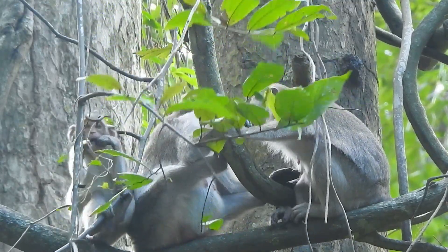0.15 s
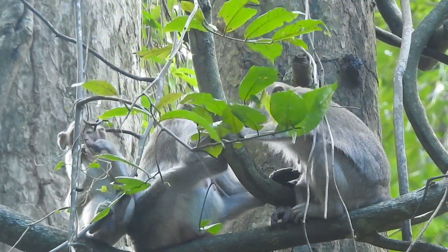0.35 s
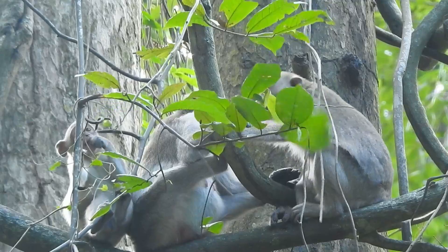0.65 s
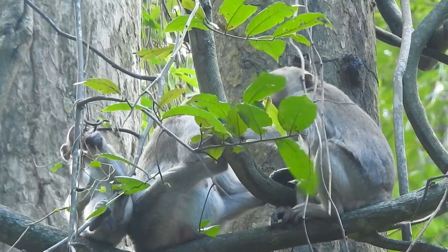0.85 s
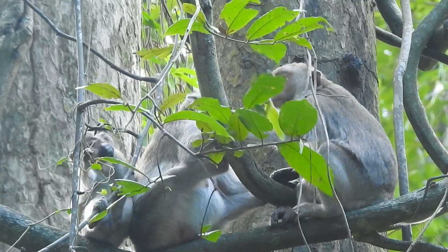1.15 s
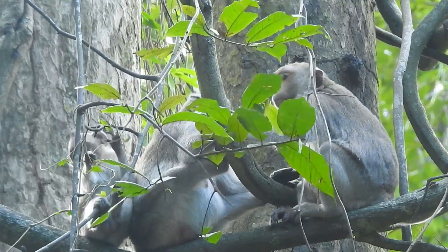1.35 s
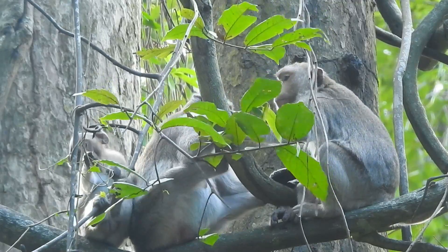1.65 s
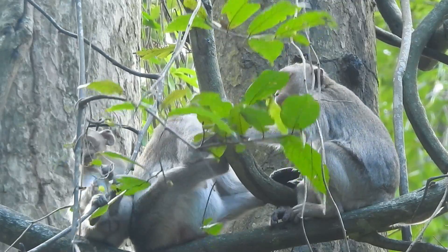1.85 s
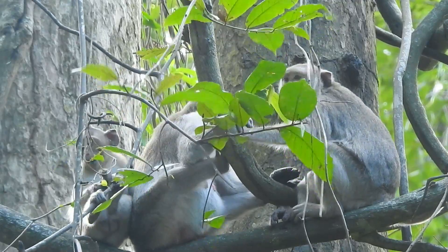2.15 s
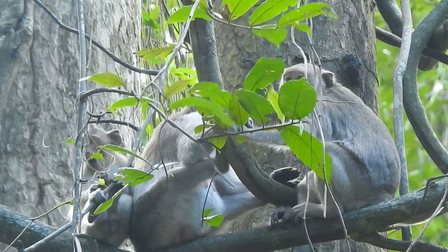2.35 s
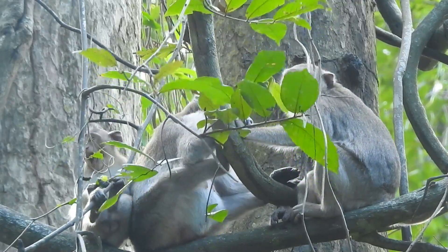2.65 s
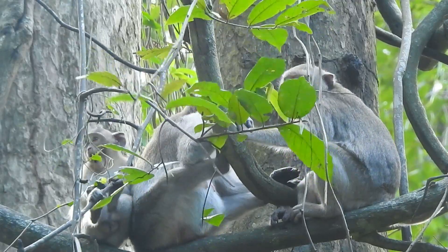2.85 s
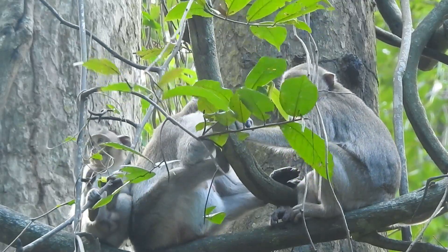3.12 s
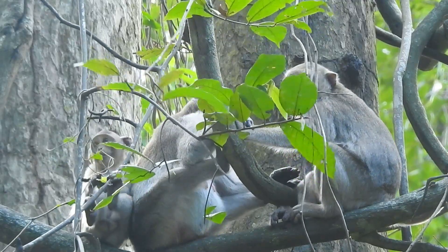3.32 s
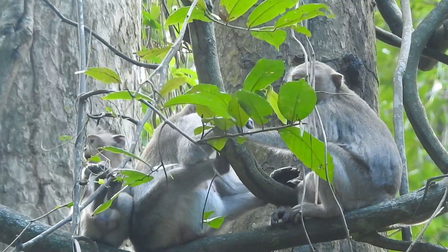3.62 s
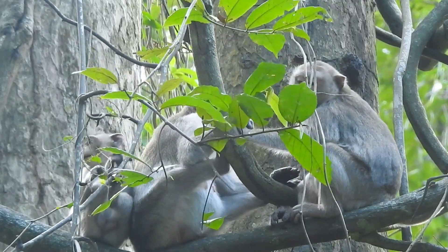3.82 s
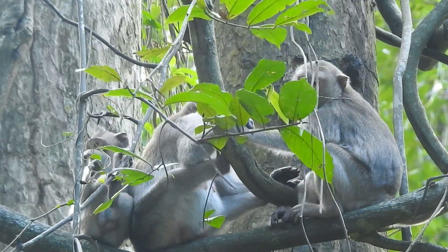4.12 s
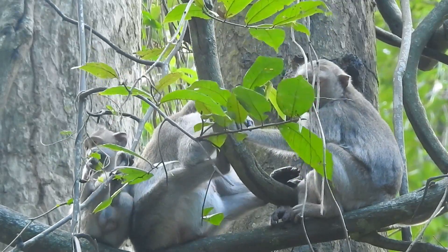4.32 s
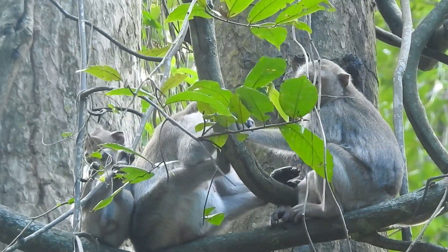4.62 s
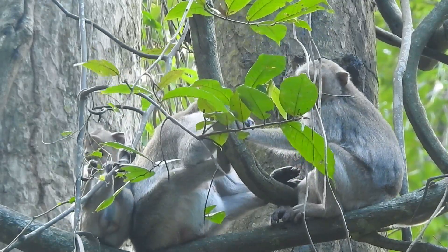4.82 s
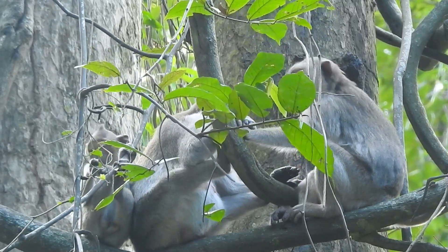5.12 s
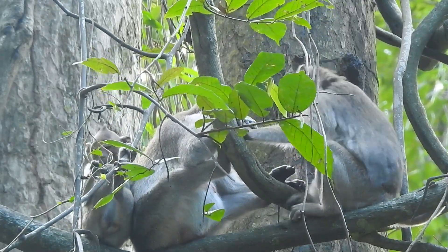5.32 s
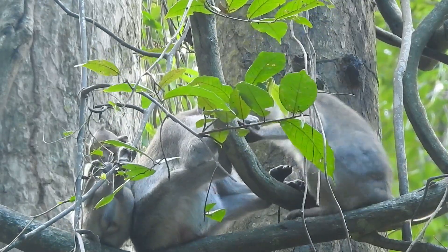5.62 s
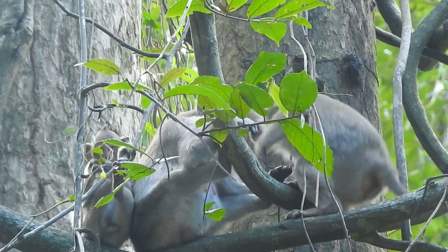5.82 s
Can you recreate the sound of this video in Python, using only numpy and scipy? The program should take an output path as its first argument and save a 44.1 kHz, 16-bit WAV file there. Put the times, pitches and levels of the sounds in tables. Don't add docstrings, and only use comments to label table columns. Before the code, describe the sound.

A single monkey calls almost continuously in short, shrill notes, hoarse low squawks breaking into higher squeals. The calls ring off trunks and leaves with a long diffuse tail. A branch rustles briefly around one and a half seconds, twigs tick now and then, and a tiny bird chips near the end. Distant traffic rumbles steadily under thin forest hiss and insect buzz, heard in stereo from moderate distance.

```python
import sys
import numpy as np
from scipy import signal
from scipy.fft import rfft, irfft
from scipy.io import wavfile
from scipy.ndimage import map_coordinates

SR = 44100
rng = np.random.default_rng(int(sys.argv[2]) if len(sys.argv) > 2 else 0)


def materialize(psi):
    bounded = np.clip(np.atleast_2d(psi).T, -1, 1)
    quanta = np.round(bounded * 32767).astype(np.int16)
    wavfile.write(sys.argv[1], SR, quanta)


def voltage_ratio(level):
    return 10 ** (np.asarray(level, float) / 20)


N = 263277


def at_hz(points, hz):
    points_hz, values = np.transpose(points)
    return np.interp(np.log(np.maximum(hz, 1)), np.log(points_hz), values)


def rms_one(x):
    return x / np.sqrt(np.mean(x ** 2) + 1e-20)


def wobble(rate_hz, size):
    r = np.exp(-2 * np.pi * rate_hz / SR)
    settled = signal.lfilter([1], [1, -2 * r, r * r], rng.standard_normal(size + 8000))[8000:]
    return rms_one(settled)


def colour(x, spectrum, lift_db=lambda hz: 0):
    hz = np.fft.rfftfreq(x.shape[-1], 1 / SR)
    gain_db = at_hz(spectrum, hz) + lift_db(np.maximum(hz, 1500))
    return rms_one(irfft(rfft(x) * voltage_ratio(gain_db), x.shape[-1]))


def resonance(x, hz, width_hz):
    r = np.exp(-np.pi * width_hz / SR)
    zeros = np.array([1, 0, -1]) * (1 - r * r) / 2
    return signal.lfilter(zeros, [1, -2 * r * np.cos(2 * np.pi * hz / SR), r * r], x)


# (frequency [Hz], likeness [0-1])
LIKENESS = [(60, 0.98), (130, 0.99), (280, 0.97), (590, .93), (1270, 0.9), (2720, 0.88), (5000, 0.83),
            (8000, 0.0), (11500, 0), (12500, .95)]


def stereo_noise(size):
    mid, side = rfft(rng.standard_normal((2, size)))
    alike = np.clip(at_hz(LIKENESS, np.fft.rfftfreq(size, 1 / SR)), 0, 1)
    ears = np.sqrt(1 + alike) * mid + np.sqrt(1 - alike) * side * [[1], [-1]]
    return irfft(ears, size) / np.sqrt(2)


# (frequency [Hz], density [dB per Hz])
TRAFFIC = [(13, -55), (22, -41), (45, -8), (90, -0.5), (108, 2.5), (137, -0.5), (200, -5), (229, -8),
           (265, -17.5), (400, -24), (520, -39), (880, -120)]
# (frequency [Hz], density [dB per Hz])
AIR = [(180, -54), (300, -4.5), (474, -2), (670, -1.5), (760, -6.5), (835, -5), (1670, -6.5), (1890, -8),
       (2080, -5), (3910, -10.5), (4720, 3), (5350, -4), (12900, -35.5), (16800, -78), (22000, -120)]
TRAFFIC_DB, TRAFFIC_SWELL_DB, TRAFFIC_SWELLS_PER_S = -37, 2.17, 4.8
AIR_DB, AIR_SWELL_DB, AIR_SWELLS_PER_S = -43.5, 1.0, 12


def background():
    traffic_db = TRAFFIC_DB + TRAFFIC_SWELL_DB * wobble(TRAFFIC_SWELLS_PER_S, N)
    rumble = colour(stereo_noise(N), TRAFFIC) * voltage_ratio(traffic_db)
    air_db = AIR_DB + AIR_SWELL_DB * wobble(AIR_SWELLS_PER_S, N)
    return rumble + colour(stereo_noise(N), AIR) * voltage_ratio(air_db)


INSECT_HZ, INSECT_WIDTH_HZ, INSECT_DB, INSECT_PULSES_PER_S = 4700, 330, -51, 110


def insects():
    t = np.arange(N) / SR
    pulse_phase = 2 * np.pi * INSECT_PULSES_PER_S * t + 4.3 * wobble(4.6, N)
    gate = (1 + np.cos(pulse_phase)) ** 2.2
    drive = rng.standard_normal((2, N)) * gate * voltage_ratio(1.3 * wobble(18, N))
    wing = resonance(drive, INSECT_HZ, INSECT_WIDTH_HZ)
    wing = resonance(wing, INSECT_HZ, INSECT_WIDTH_HZ)
    return voltage_ratio(INSECT_DB) * rms_one(wing)


# (time [s], peak level [dB])
CHIPS = [
    (5.681, -37),
    (5.858, -45),
]
CHIP_TOP_HZ, CHIP_FALL_HZ_PER_S, CHIP_S = 4850, 60000, .005


def chips():
    at_s, peak_db = np.array(CHIPS).T[:, :, None]
    t = np.arange(N) / SR - at_s
    tone = np.sin(2 * np.pi * (CHIP_TOP_HZ * t - CHIP_FALL_HZ_PER_S * t ** 2 / 2))
    return (voltage_ratio(peak_db) * tone * np.exp(-(t / CHIP_S) ** 2)).sum(axis=0)


# (time [s], level [dB], leaf contacts [per s])
RUSTLE = [
    (1.439, -48, 1400),
    (1.501, -39.5, 4100),
    (1.561, -42.5, 8300),
    (1.622, -43.5, 7200),
    (1.68, -48.5, 3200),
    (1.74, -46, 230),
]
# (frequency [Hz], density [dB per Hz])
LEAVES = [(150, -48), (300, -23), (800, -22), (1600, -24.5), (2200, -15.5), (4000, -24), (6600, -11),
          (9000, -26.5), (13000, -41)]


def rustle():
    s, level_db, per_s = np.transpose(RUSTLE)
    t = np.arange(N) / SR
    contact = rng.random((2, N)) < np.interp(t, s, per_s) / SR
    hits = contact * rng.standard_normal((2, N))
    hits = hits * voltage_ratio(1.4 * np.minimum(rng.exponential(1, (2, N)), 4))
    low = signal.lfilter([.2], [1, -.8], hits)
    hits = hits - low + low.mean(axis=0) * 2.1 + 0.048 * hits[::-1]
    return colour(hits, LEAVES) * voltage_ratio(np.interp(t, s, level_db, left=-120, right=-120))


# (time [s], peak level [dB], centre [Hz], width [Hz])
TICKS = [(1.4, -30, 3500, 3100), (1.555, -25, 5700, 4000), (1.574, -37, 10500, 3000),
         (1.54, -39, 10000, 3000), (1.587, -30, 550, 400), (2.533, -20.5, 1800, 2400),
         (2.535, -29, 600, 800), (2.531, -27, 4500, 3000), (3.549, -29, 4600, 2600),
         (4.235, -36, 6400, 3600), (4.457, -24, 3200, 1200), (4.467, -22.5, 5200, 2300),
         (5.733, -35, 2140, 350), (5.741, -35, 6500, 3500), (5.748, -36, 6000, 3500)]


def twigs():
    out, t = np.zeros(N), np.arange(1200) / SR
    for s, peak_db, hz, width_hz in TICKS:
        burst = rng.standard_normal(len(t)) * t / .001 * np.exp(-t / 0.0031)
        ring = resonance(resonance(burst, hz, width_hz), hz, width_hz)
        ring = signal.lfilter([1, 2, 1], [1], ring)
        at = round((s - .002) * SR)
        out[at:at + len(t)] += voltage_ratio(peak_db) * ring / np.abs(ring).max()
    return out


# (frequency [Hz], T60 [s])
FOREST_T60 = [(500, 1.2), (2800, 1.2), (6000, 1.36), (9000, 1.11), (13000, 0.87)]
FOREST_DB, FOREST_BUILD_S = 1.5, 0.0044
SWAY_S, EAR_SWAY_S = .000045, .000012


def forest(x):
    t = np.arange(SR) / SR
    white, tail = stereo_noise(SR), 0
    edges_hz = 200 * 2 ** np.arange(0, 6.6, .5)
    for low, high in zip(edges_hz, edges_hz[1:]):
        half_octave = signal.butter(2, [low, high], "band", fs=SR, output="sos")
        decay = voltage_ratio(-60 * t / at_hz(FOREST_T60, np.sqrt(low * high)))
        tail = tail + signal.sosfilt(half_octave, white) * decay
    tail = tail * (1 - np.exp(-t / FOREST_BUILD_S))
    tail = tail / np.sqrt(np.sum(tail ** 2) / 2)
    sway = np.arange(N) + SWAY_S * SR * wobble(24, N)
    wet = signal.fftconvolve(map_coordinates(x, [sway], order=3)[None], tail, axes=1)[:, :N]
    stir = np.arange(N) + SWAY_S * SR * wobble(30, N)
    ears = [map_coordinates(ear, [stir + EAR_SWAY_S * SR * wobble(8, N)], order=3) for ear in wet]
    return voltage_ratio(FOREST_DB) * np.array(ears)


def nearest(table, s):
    return min(table, key=lambda row: abs(row[0] - s))[1:]


def waver(rate_hz, size):
    return wobble(rate_hz, 11000)[:size]


# (time [s], pitch settling [s], favoured resonance [Hz], its lift [dB], added chest [dB])
PLACING = [(0, 0.042, 3500, 2.5, 3.5), (.154, 0.012, 4440, 3.5, -5), (.315, 0.012, 3680, -3.5, 0),
           (.472, 0.0019, 5700, 2, -8), (.66, 0.024, 3480, 0, 0), (.845, 0.032, 3540, 0.5, 5.5),
           (.87, .025, 4050, 5.5, -0.5), (.965, 0.024, 5170, 6, 4), (1.14, 0.027, 3450, -1.5, 2),
           (1.378, 0.033, 3700, 9, 3), (1.432, 0.023, 3440, 9, -4.5), (1.52, 0.019, 3540, -8, -5.5),
           (1.605, 0.013, 6200, 12, -17), (1.73, 0.035, 4600, 5.5, 2.5), (1.91, 0.026, 3500, 2, 1.5),
           (1.995, 0.014, 3900, 10, -1), (2.05, 0.019, 4570, 5, 1), (2.215, 0.028, 4280, 0, 1.5),
           (2.41, 0.033, 5740, 1, 1.5), (2.455, 0.024, 2680, 16.5, -4.5), (2.535, 0.017, 4800, 2, -11),
           (2.563, 0.0027, 6000, -2, -4.5), (2.6, .014, 6450, 8, -3), (2.78, 0.038, 4570, 1.5, 2.5),
           (3.11, 0.029, 3600, 7.5, 4), (3.187, 0.0198, 5060, 8, -2), (3.272, 0.0025, 4200, 6.5, 0),
           (3.345, 0.023, 2740, 20, -4), (3.505, 0.024, 3680, 3.5, 0.5), (3.598, 0.0034, 4770, 0, -9),
           (3.855, 0.016, 4520, 2, -0.5), (4.01, 0.02, 4480, 1, -18), (4.22, 0.026, 3770, 2, 3),
           (4.34, 0.013, 6030, 3.5, -4), (4.44, 0.025, 3070, 11, 0), (4.575, 0.009, 3900, 1, 2),
           (4.75, 0.022, 4500, 8, 4), (4.81, 0.057, 2280, 1.5, 4), (4.96, 0.069, 4280, 5, 1),
           (5.065, 0.024, 3040, 1.5, -2.5), (5.325, 0.058, 4980, 8, -2.5), (5.45, 0.022, 3720, -1, -11)]
# (time [s], overshoot [share], time to top [s], later sag [share per s])
ARCHES = [
    (.024, 0.0045, .01, 0.51),
    (.315, 0.009, 0.021, 0),
    (3.272, 0.00025, .01, 0.25),
    (3.505, 0.01, 0.011, 0.043),
    (3.598, 0.048, 0.00546, 0.0086),
    (3.855, 0.021, .03, 0.011),
    (4.22, .02, 0.053, 0.185),
    (4.575, 0.0044, 0.039, 0),
    (4.96, .005, 0.036, 0),
    (5.325, 0.014, 0.026, 0.29),
]


def fold_pitch(t, s, onset_hz, held_hz, sag, hold_s):
    settle_s = max(nearest(PLACING, s)[0], .003)
    arches = [row[1:] for row in ARCHES if abs(row[0] - s) < .005]
    arch, top_s, sag = arches[0] if arches else (0, 1, sag)
    moving_s = np.maximum(t - hold_s * (onset_hz < held_hz), 0)
    pitch = held_hz * (1 - sag * t) + (onset_hz - held_hz) * np.exp(-moving_s / settle_s)
    rise = moving_s / max(top_s, .003)
    return pitch * (1 + arch * rise * np.exp(1 - rise))


BREAKS_DB = 3
RASP_FROM_PARTIAL, RASP_SLOPE_DB_PER_OCTAVE = 5.5, -16


def fold_source(pitch, harsh):
    size = len(pitch)
    tremble = (.003 + .014 * harsh) * waver(35, size) + .05 * harsh ** 2 * waver(200, size)
    phase = 2 * np.pi * np.cumsum(pitch * (1 + tremble)) / SR
    k = np.arange(1, 19)[:, None]
    breaks_db = BREAKS_DB * np.array([signal.detrend(waver(40, size), type="constant") for _ in k])
    rasp_db = RASP_SLOPE_DB_PER_OCTAVE * np.log2(np.maximum(k / RASP_FROM_PARTIAL, 1))
    partials = voltage_ratio(breaks_db + rasp_db) * (k * pitch.max() < 13000)
    pulses = rms_one((partials * np.cos(k * phase + 0.298 * k ** 2)).sum(axis=0))
    chaos = rms_one(rng.standard_normal(size) * (1 + 0.11 * np.cos(phase)))
    flutter = voltage_ratio((-0.5 + 0.39 * harsh) * waver(50, size))
    return (np.sqrt(1 - harsh ** 1.5) * pulses + harsh ** .75 * chaos) * flutter


# (time [s], gape [-1 pressed to 1 open], lip resonance [Hz], bared teeth [0-1])
GAPE = [(0, -0.48, 3940, 0.76), (.15, -0.61, 4400, 0.65), (.47, 0.28, 5300, 0), (0.851, -0.24, 3830, 0.6),
        (1.2, 0.39, 3530, 0.36), (1.34, 0.28, 4780, 0.6), (1.52, -0.26, 3220, 0.5), (1.73, 0.99, 4760, 0.6),
        (2.0, 1, 4170, 0.47), (2.45, 0.16, 2900, 0.26), (2.8, -0.5, 4460, 0.86), (3.199, -0.4, 4240, 0.92),
        (3.55, 0.57, 4160, 0.07), (3.95, 0.11, 4430, 0.45), (4.35, -1, 3920, 0.76), (4.8, 0.71, 4740, 0.65),
        (5.07, -0.51, 3270, 0.6), (5.4, 0.69, 4470, 0.6)]
# (time [s], resonance [Hz], lift or dip [dB], attack [s])
ACCENTS = [(0, 7300, -5, .004), (.024, 4230, 5, 0.013), (.154, 6260, 5.5, 0.019), (.315, 5450, -2, 0.029),
           (.472, 6800, -6, 0.034), (.66, 5000, 0, 0.027), (.845, 5040, -1, 0.027), (.87, 5570, 7, 0.044),
           (.965, 4300, 0, 0.023), (1.14, 5000, 1.5, 0.025), (1.342, 5400, 4, 0.023),
           (1.378, 4840, 5.5, 0.016), (1.432, 5300, 5.5, 0.0085), (1.52, 6700, 8, 0.035),
           (1.605, 4600, -4, .015), (1.73, 5900, 3, 0.027), (1.91, 4100, 2.5, 0.056),
           (1.995, 5300, 6, 0.037), (2.05, 5730, 5, 0.017), (2.215, 5060, 4.5, 0.034),
           (2.41, 8000, 7, 0.032), (2.455, 4300, 1, 0.0092), (2.535, 8000, 3, 0.011),
           (2.563, 4700, 2, 0.023), (2.6, 4850, -4, 0.028), (2.78, 5160, 5, 0.044),
           (3.11, 4840, 4.5, 0.055), (3.19, 4200, 1, 0.02), (3.245, 5000, 3, 0.043),
           (3.272, 5600, 8.5, .02), (3.345, 4150, -14, 0.033), (3.505, 6060, 0, 0.031),
           (3.598, 8040, 2.5, 0.022), (3.855, 5260, 3, 0.038), (4.01, 5470, 2, .03), (4.22, 4700, 4, 0.042),
           (4.3, 5700, -2, 0.027), (4.34, 7500, 0, 0.015), (4.44, 6000, 3, 0.017), (4.575, 5170, 6, 0.039),
           (4.75, 5500, 5, 0.018), (4.81, 4500, 2, 0.016), (4.96, 3300, 0, 0.022), (5.065, 4750, 0, 0.018),
           (5.325, 4250, 5, 0.041), (5.45, 4980, -8, 0.022)]
GAPE_CHEST_DB, GAPE_TILT_DB = 11.5, 4
LIP_DB, LIP_WIDTH_HZ = 2.5, 280
BARED_DB, BARED_HZ = 16, 7200
PLACING_WIDTH_HZ, MOUTH_WIDTH_HZ = 215, 400


def mouth_lift(s, mouth):
    first_hz, first_db, second_hz, second_db, chest_db, tilt_db = mouth
    at_s, *face = np.transpose(GAPE)
    gape, lip_hz, bared = [np.interp(s, at_s, column) for column in face]
    _, placed_hz, placed_db, added_db = nearest(PLACING, s)
    accent_hz, accent_db, _ = nearest(ACCENTS, s)
    chest_db = chest_db + GAPE_CHEST_DB * gape + added_db
    tilt_db = tilt_db + GAPE_TILT_DB * gape
    peaks = [(first_hz, first_db, MOUTH_WIDTH_HZ), (second_hz, second_db, MOUTH_WIDTH_HZ),
             (accent_hz, accent_db, MOUTH_WIDTH_HZ), (placed_hz, placed_db, PLACING_WIDTH_HZ),
             (lip_hz, LIP_DB, LIP_WIDTH_HZ)]

    def lift_db(hz):
        cavities = sum(db * np.exp(-.5 * ((hz - peak_hz) / width_hz) ** 2) for peak_hz, db, width_hz in peaks)
        teeth = BARED_DB * (bared - .4) / (1 + (BARED_HZ / hz) ** 8)
        chest = chest_db / (1 + (hz / 2900) ** 10)
        tilt = tilt_db * np.log2(np.minimum(hz, 9500) / 4500)
        return cavities + teeth + chest + tilt

    return lift_db


# (time [s], added harshness [0-1 scale])
STRAIN = [(0, -.15), (.024, .2), (.145, -.08), (.315, -.1), (.465, -.14), (.66, .08), (.845, .05),
          (.87, -.03), (.965, .08), (1.3, 0), (1.35, -.05), (1.378, -.2), (1.432, .02), (1.52, .2),
          (1.605, -.05), (1.7, -.26), (1.91, .03), (2.0, -.03), (2.3, 0), (2.41, -.12), (2.455, .05),
          (2.535, -.12), (2.6, -.1), (2.78, .03), (3.11, .04), (3.19, -.08), (3.245, .2), (3.272, -.05),
          (3.345, -.1), (3.505, .08), (3.6, -.02), (3.855, -.04), (4.22, 0), (4.34, -.15), (4.575, -.14),
          (4.81, 0), (4.96, -.2), (5.065, .05), (5.325, -.12), (5.45, -.03)]
# (frequency [Hz], density [dB per Hz])
THROAT = [(600, -28), (1200, -12), (1800, -8.5), (2300, -13.5), (3020, -3), (3280, 2), (3800, 0.5),
          (4400, 3), (5400, -2), (6300, 3), (7700, -10), (8500, -18.5), (11000, -32.5), (13100, -53)]
LEAD_S, RELEASE_S = .008, .016
SCOOP_DB_PER_OCTAVE = 4


def note(row, folds, voice, mouth):
    s, length_s, onset_hz, held_hz, level_db = row
    (harsh, sag, hold_s), (change_db, shape) = folds, voice
    harsh = np.clip(harsh + np.interp(s, *np.transpose(STRAIN)), 0, 1)
    t = np.arange(-LEAD_S, length_s + 0.023, 1 / SR)
    pitch = fold_pitch(t, s, onset_hz, held_hz, sag, hold_s)
    sound = colour(fold_source(pitch, harsh), THROAT, mouth_lift(s, mouth))
    scoop_db = SCOOP_DB_PER_OCTAVE * np.log2(np.minimum(pitch / held_hz, 1))
    effort_db = level_db + change_db * np.clip(t / length_s, 0, 1) ** shape + scoop_db
    attack_s = max(nearest(ACCENTS, s)[-1], .003)
    fade = np.minimum((t - t[0]) / attack_s, (t[-1] - t) / RELEASE_S)
    return sound * voltage_ratio(effort_db) * np.sin(np.pi / 2 * np.clip(fade, 0, 1)) ** 2


# (time [s], length [s], onset [Hz], held [Hz], level [dB])
SQUAWKS = [(.315, 0.14, 807, 914, -31), (.66, 0.051, 898, 833, -29.5), (.845, 0.058, 882, 872, -31.5),
           (.965, 0.049, 909, 886, -31.5), (1.14, 0.07, 843, 861, -31.5), (1.342, 0.018, 1077, 1040, -30.5),
           (1.73, 0.07, 1017, 902, -33.5), (1.903, 0.097, 840, 844, -30.5), (2.215, 0.048, 803, 817, -28),
           (2.455, 0.11, 825, 848, -32.5), (5.45, 0.095, 715, 726, -41.5)]
# (time [s], length [s], onset [Hz], held [Hz], level [dB])
WHINES = [(1.378, 0.037, 1030, 885, -33.5), (1.432, 0.073, 890, 896, -32.5), (2.772, 0.12, 749, 736, -36.5),
          (3.105, 0.082, 971, 880, -33.5), (3.19, 0.052, 877, 828, -33.5), (3.245, .025, 850, 858, -39),
          (3.855, 0.12, 688, 755, -36), (4.22, 0.066, 840, 986, -35.5), (4.3, 0.053, 945, 894, -36.5),
          (4.575, 0.12, 704, 745, -37), (4.81, 0.14, 735, 752, -46), (5.325, 0.094, 755, 715.4, -36.5)]
# (time [s], length [s], onset [Hz], held [Hz], level [dB])
YELPS = [(0, .012, 1227, 1208, -28), (.024, 0.054, 1211, 1187, -28.5), (2.05, 0.049, 1120, 1148, -29),
         (2.41, 0.051, 1095, 1140, -27.5), (3.505, 0.071, 1276, 1212, -28.5), (4.01, 0.02, 1140, 1095, -30),
         (4.75, 0.032, 1154, 1104, -32.5), (4.96, 0.11, 1066, 1095, -28.5)]
# (time [s], length
# [s], onset [Hz], held [Hz], level [dB])
SQUEALS = [(.154, 0.045, 1652, 1502, -28), (.477, 0.043, 1275, 1417, -26.5), (.87, 0.083, 1286, 1402, -32),
           (1.52, 0.057, 1498, 1507, -25), (1.605, 0.037, 1632, 1500, -33.5),
           (1.995, 0.035, 1342, 1296, -31.5), (2.535, 0.043, 1615, 1606, -29.5),
           (2.563, 0.028, 1610, 1508, -32), (2.6, 0.033, 1588, 1613, -32.5),
           (3.272, 0.037, 1255, 1427, -28), (3.345, 0.056, 1360, 1395, -42),
           (3.598, 0.066, 1390, 1558, -28.5), (4.345, 0.043, 1509, 1522, -27.5),
           (4.44, .15, 1512, 1533, -41), (5.065, 0.06, 1590, 1560, -30)]
# (harshness 0 clear - 1 chaotic, pitch sag share per s, onset hold s)
SQUAWK_FOLDS, WHINE_FOLDS = (.75, 0, .008), (.54, 0, .008)
YELP_FOLDS, SQUEAL_FOLDS = (.54, 0, .008), (.5, .1, .016)
# (level change over the note dB, shape of that change)
SQUAWK_VOICE, WHINE_VOICE = (-5, 2), (2.2, 0.12)
YELP_VOICE, SQUEAL_VOICE = (-6, 0.45), (-2, 1.14)
# (first resonance Hz, lift dB, second resonance Hz, lift dB, chest dB, brightness dB per octave)
SQUAWK_MOUTH, WHINE_MOUTH = (3500, 0.96, 3570, 2.04, 2.6, 5.54), (2140, 10.3, 6760, 4.3, 2.1, 4.7)
YELP_MOUTH, SQUEAL_MOUTH = (2270, 11.4, 7370, 3.5, 1, 4.2), (9600, 0.37, 7700, 3.9, 2.5, 0.31)


def monkey():
    out = np.zeros(N + SR)
    kinds = [(SQUAWKS, SQUAWK_FOLDS, SQUAWK_VOICE, SQUAWK_MOUTH), (WHINES, WHINE_FOLDS, WHINE_VOICE, WHINE_MOUTH),
             (YELPS, YELP_FOLDS, YELP_VOICE, YELP_MOUTH), (SQUEALS, SQUEAL_FOLDS, SQUEAL_VOICE, SQUEAL_MOUTH)]
    for rows, *kind in kinds:
        for row in rows:
            sound, at = note(row, *kind), round(row[0] * SR)
            out[at:at + len(sound)] += sound
    return out[round(LEAD_S * SR):][:N]


def scene():
    voice, ticks = monkey(), twigs() + chips()
    near = voice + ticks + forest(voice + 0.14 * ticks) + rustle()
    return (near + insects() + background()) * voltage_ratio([[.3], [-.3]])


def band_limit(x):
    return signal.sosfilt(signal.butter(12, 13080, fs=SR, output="sos"), x)


SIDE_CUT_HZ, CUTOFF_HZ = 10100, 13090


def record(dry):
    hz, (left, right) = np.fft.rfftfreq(N, 1 / SR), rfft(dry)
    mid = (left + right) / 2
    side = (left - right) / 2 * (.1 + .9 / (1 + (hz / SIDE_CUT_HZ) ** 24))
    mix = irfft((mid + side * [[1], [-1]]) * (hz < CUTOFF_HZ), N)
    return band_limit(mix)


dry = scene()
out = record(dry)
materialize(out)
```